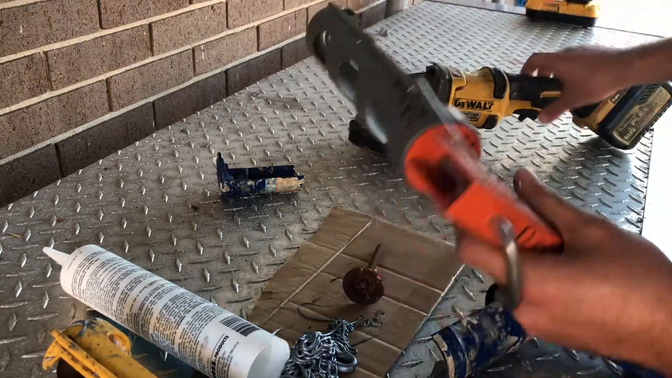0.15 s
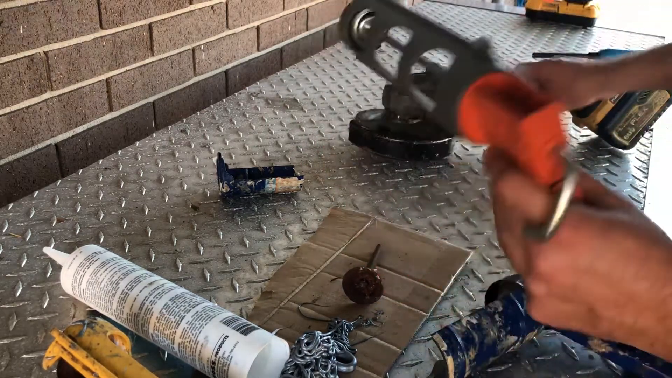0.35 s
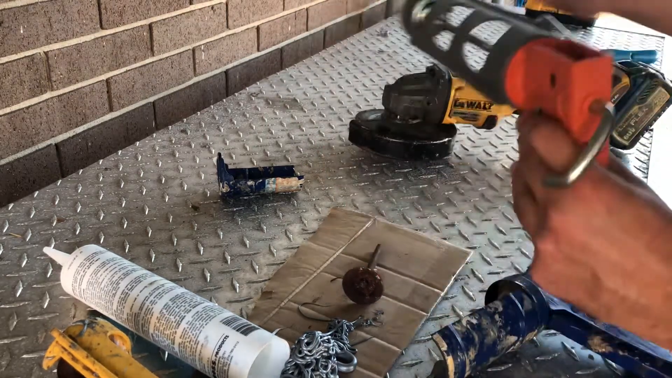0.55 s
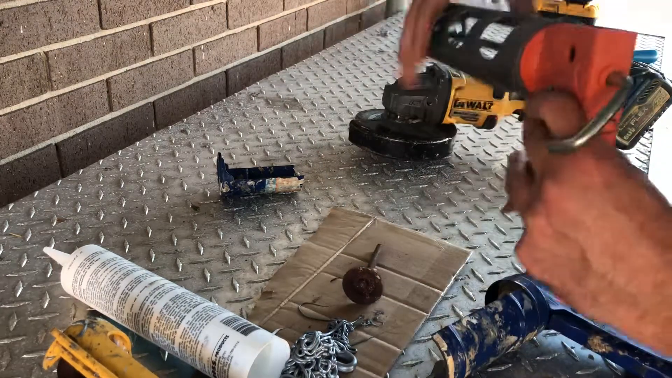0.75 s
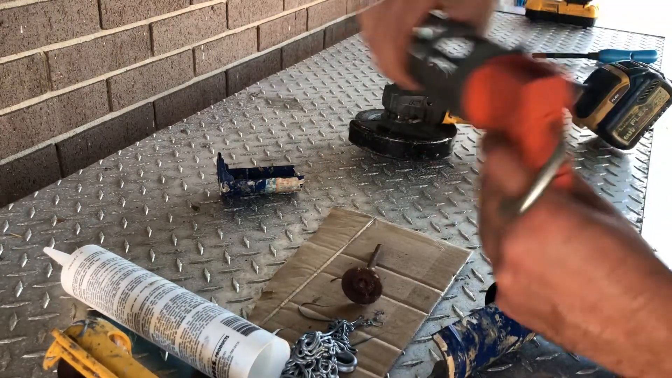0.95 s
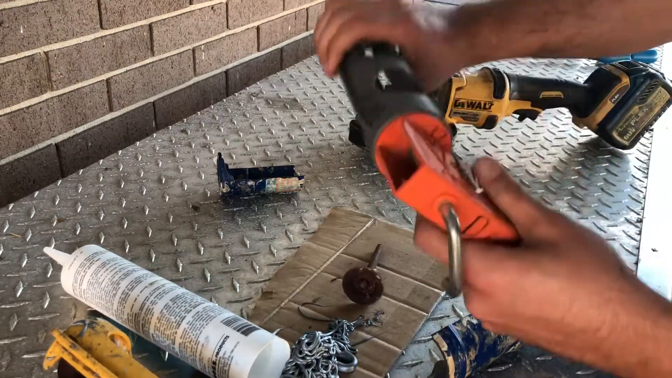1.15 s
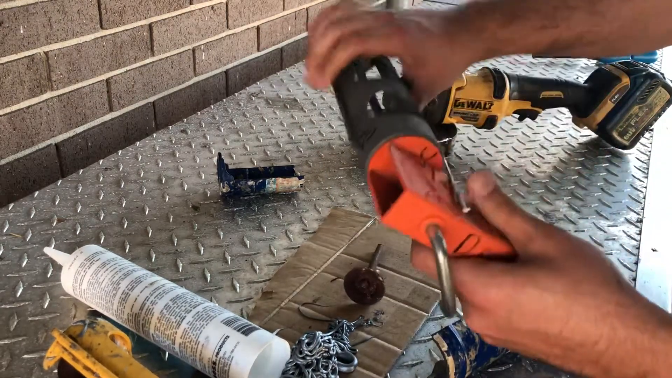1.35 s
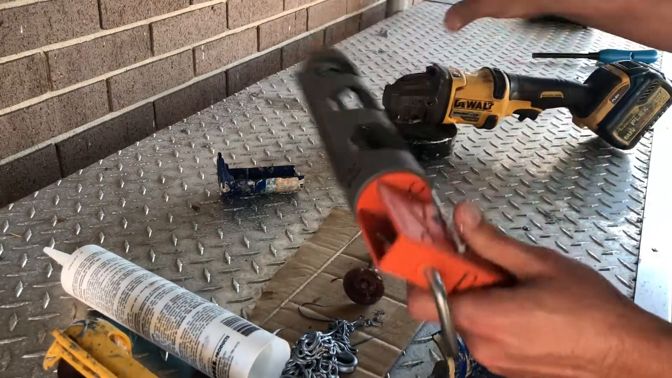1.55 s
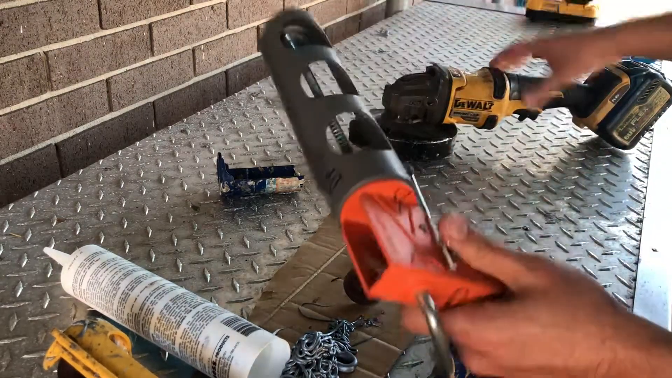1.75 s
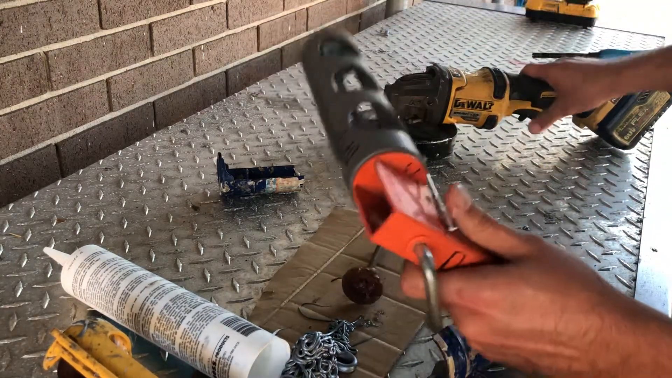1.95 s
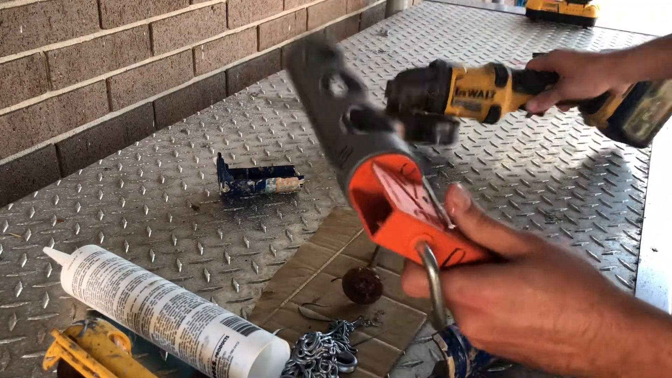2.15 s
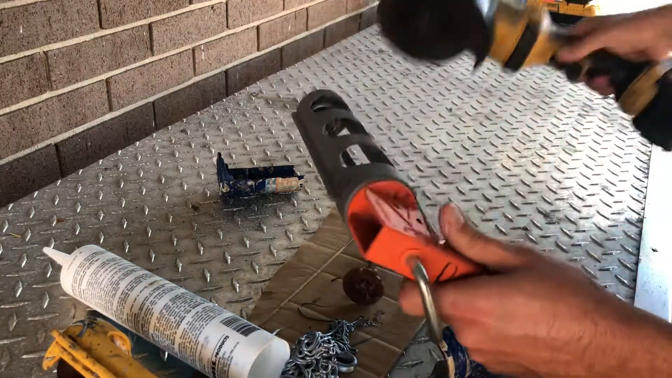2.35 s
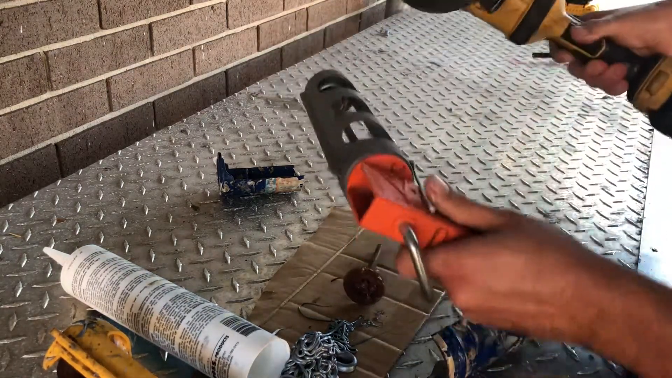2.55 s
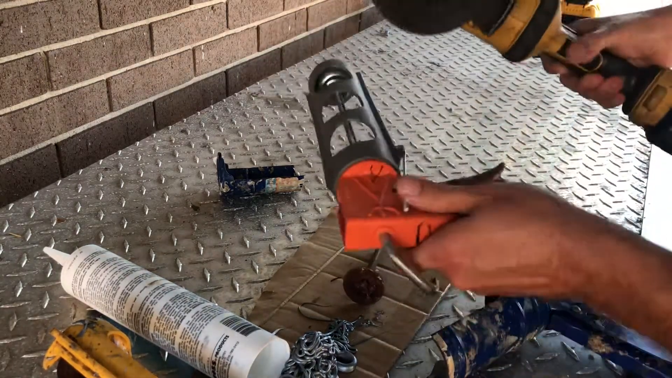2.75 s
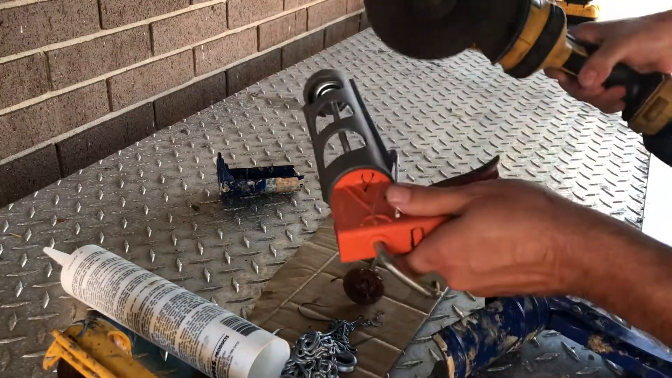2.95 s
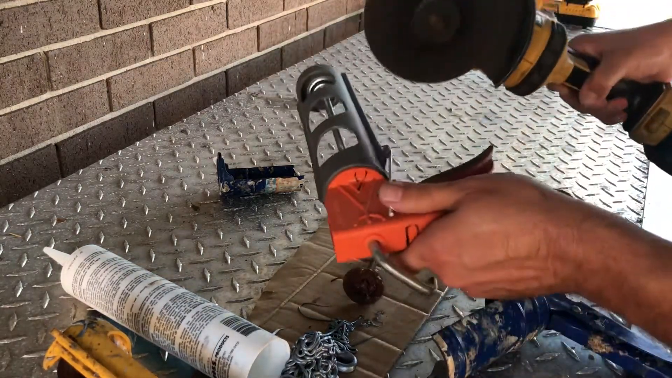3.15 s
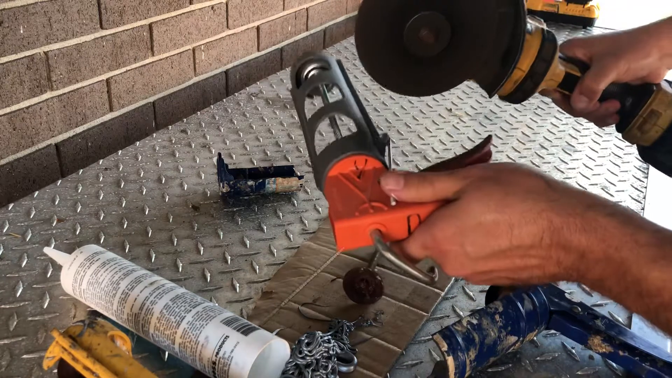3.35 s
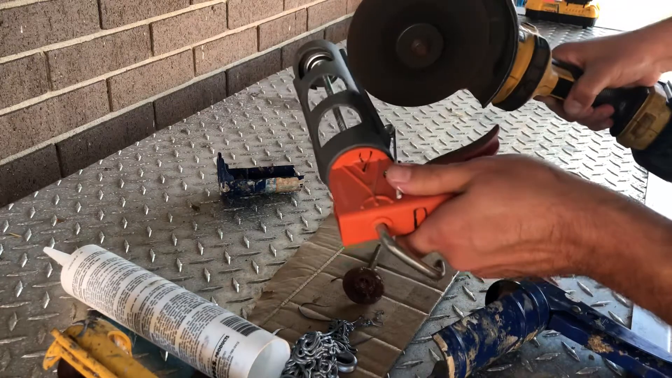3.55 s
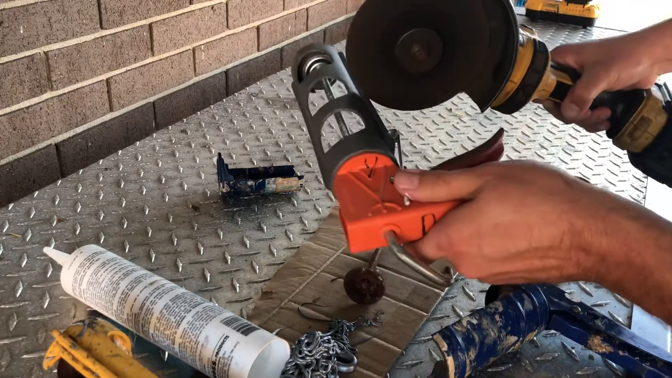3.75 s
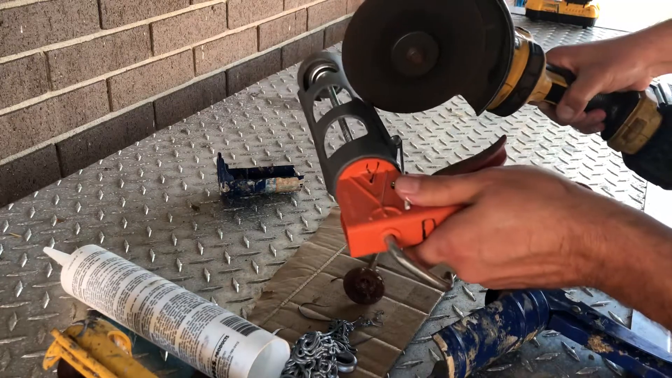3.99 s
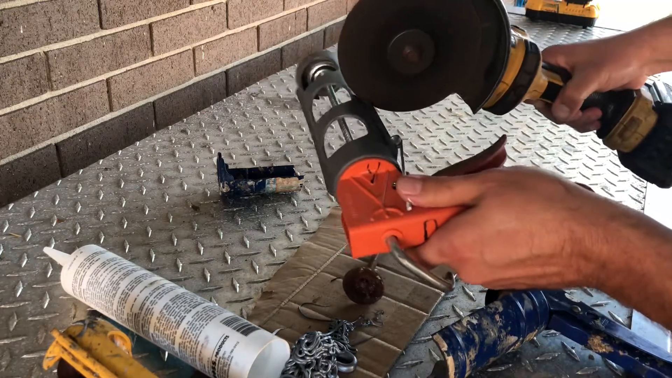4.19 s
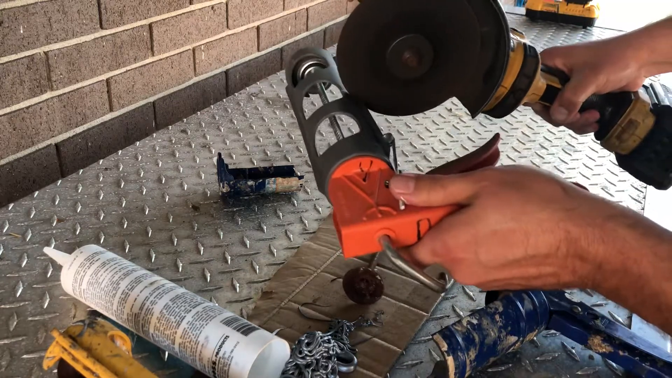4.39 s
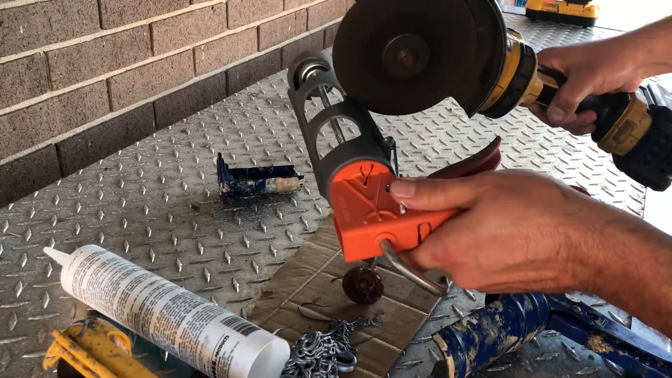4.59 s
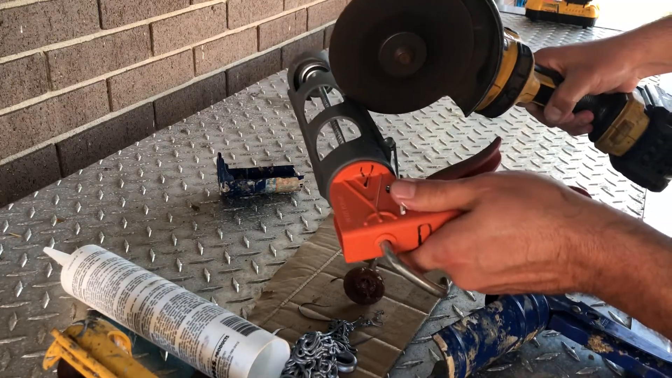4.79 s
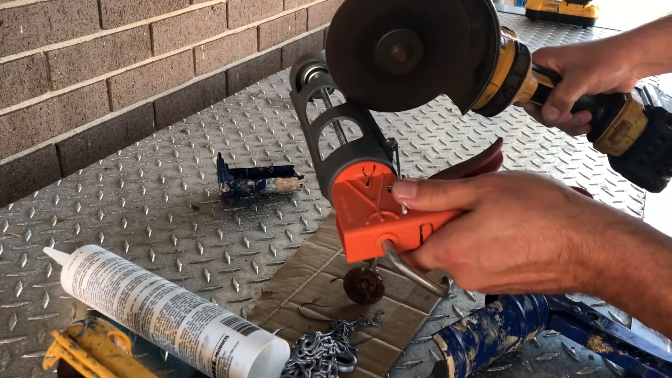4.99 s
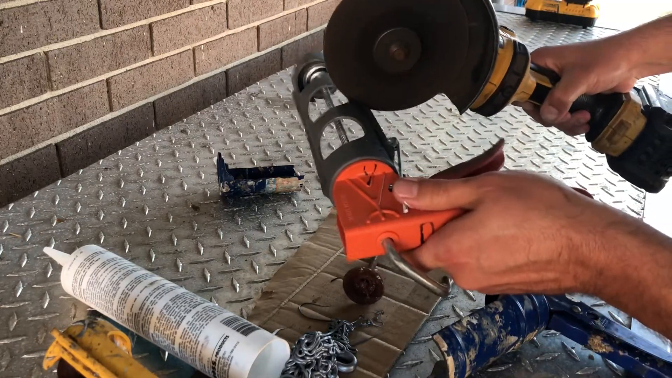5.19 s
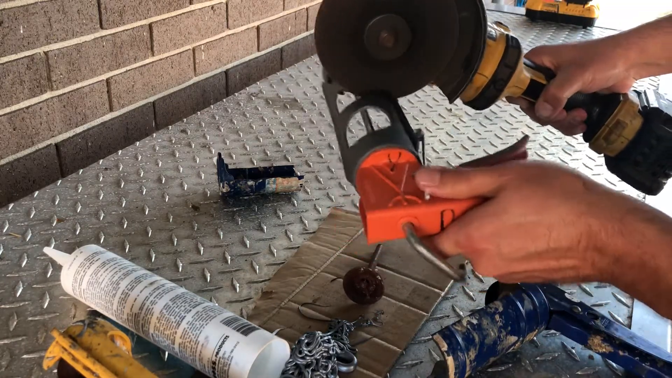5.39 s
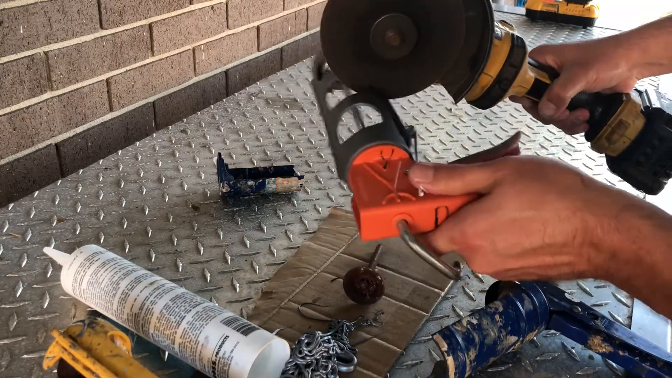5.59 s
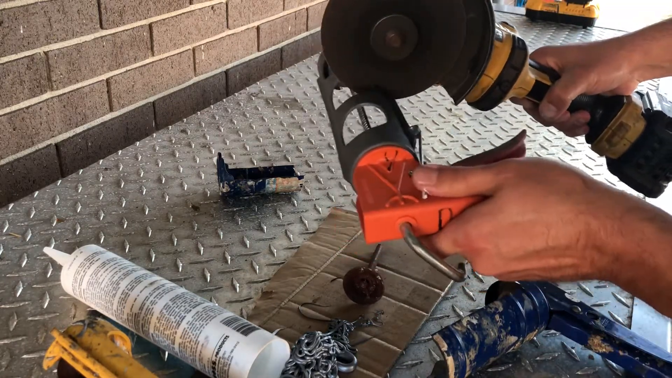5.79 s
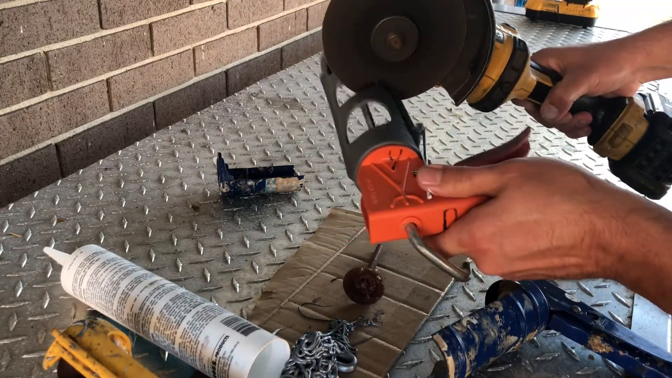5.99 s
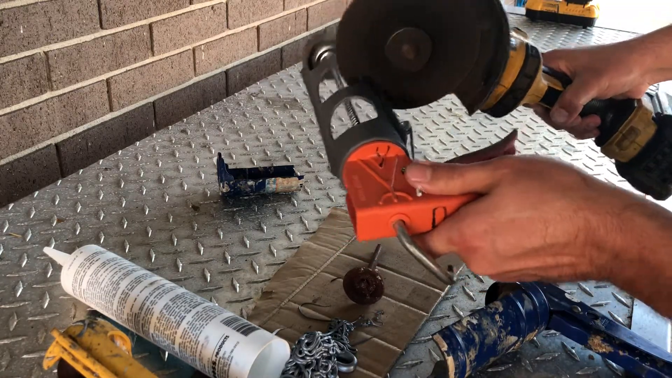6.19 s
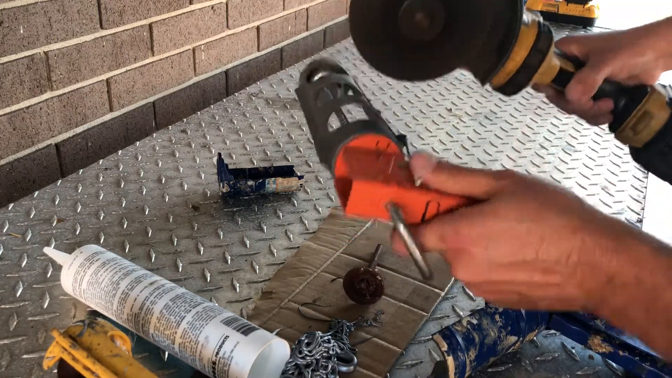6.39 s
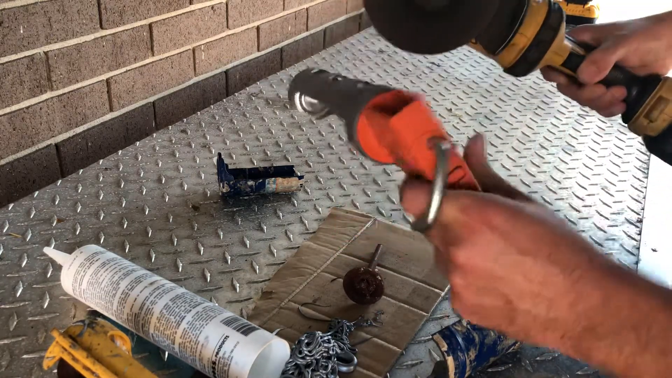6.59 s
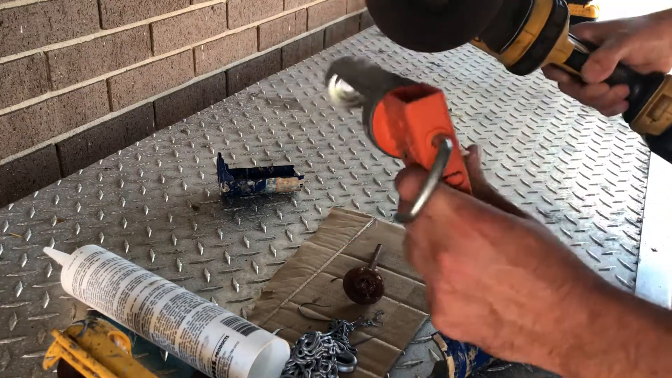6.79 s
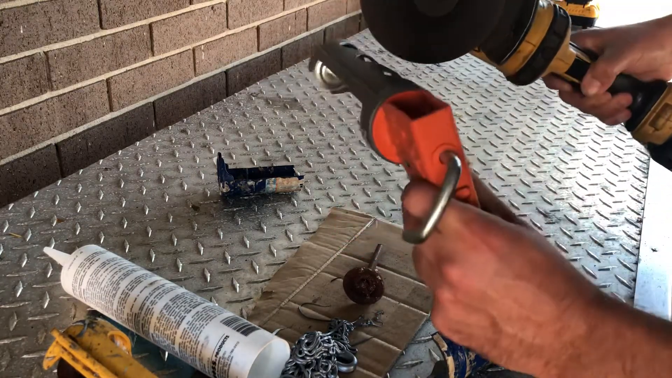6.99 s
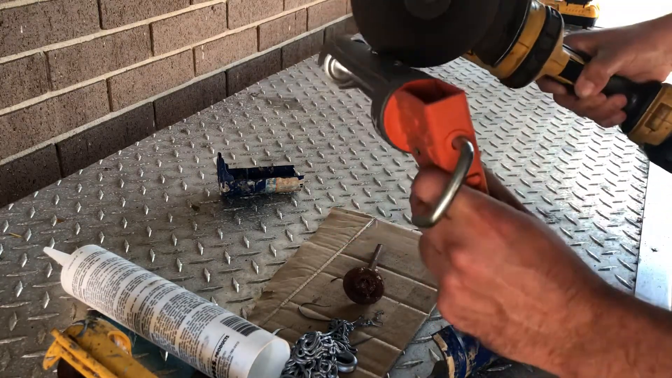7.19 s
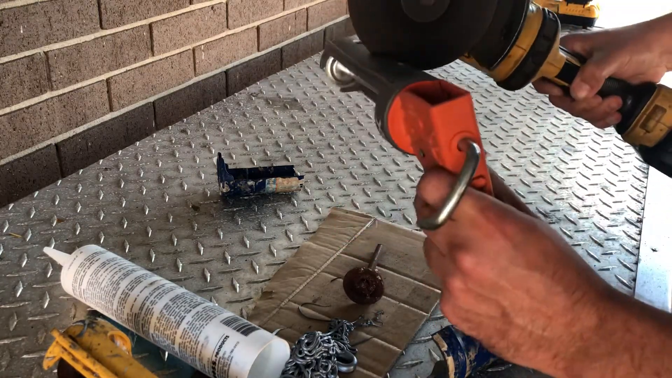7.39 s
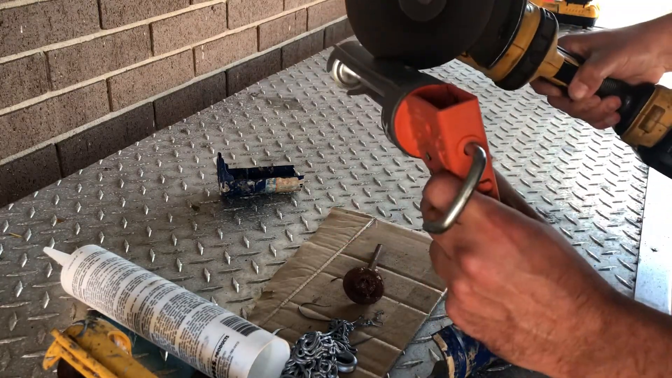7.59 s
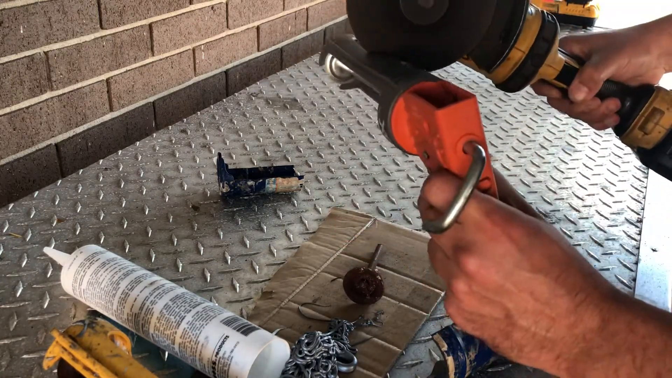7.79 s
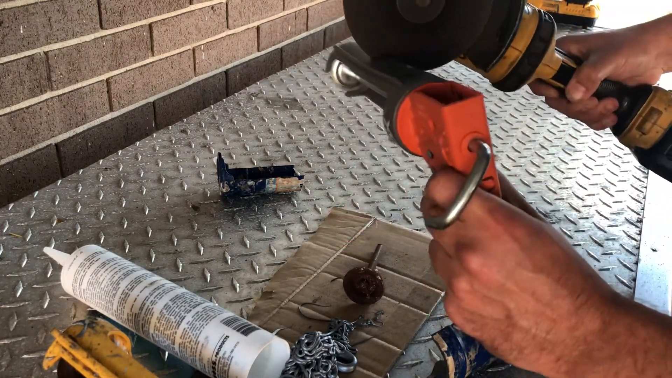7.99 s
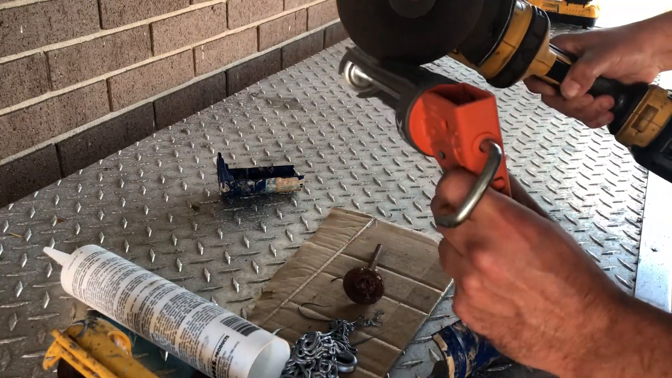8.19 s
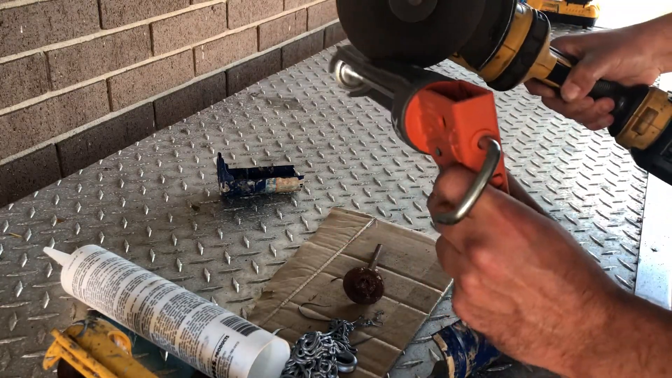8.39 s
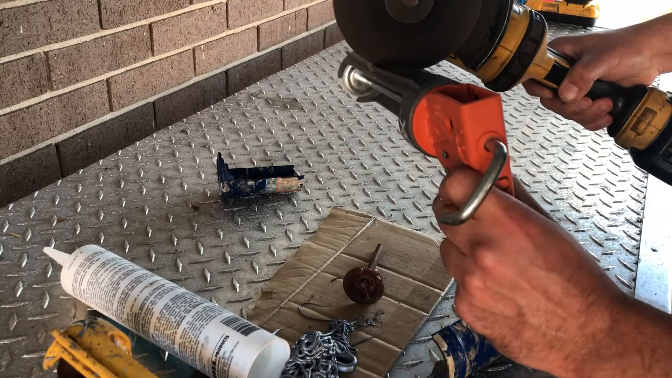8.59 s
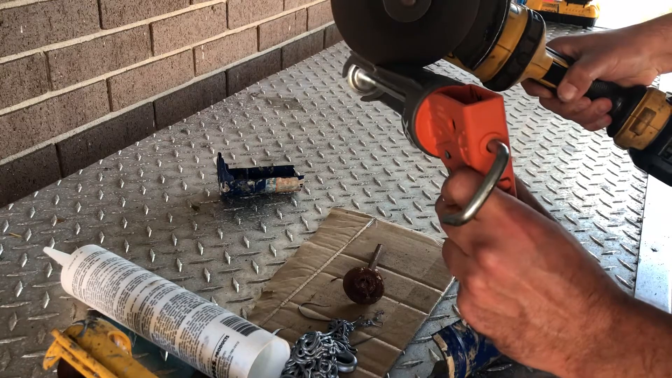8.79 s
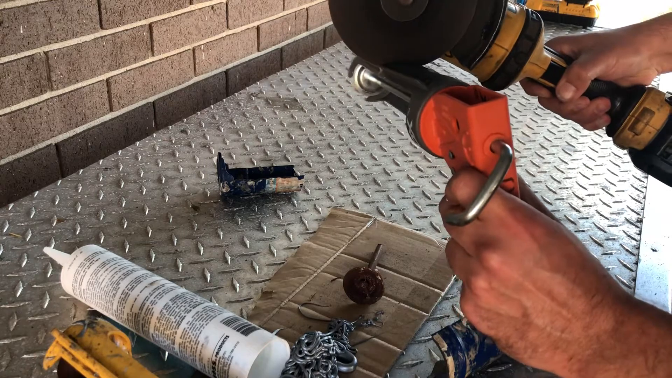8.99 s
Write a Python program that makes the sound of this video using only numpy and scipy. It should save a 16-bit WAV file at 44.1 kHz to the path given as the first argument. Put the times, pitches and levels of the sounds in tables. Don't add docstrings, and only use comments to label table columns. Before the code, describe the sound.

A quiet open yard: low wash, thin steady whistles of a far fan, faint traffic rumble. From 0.2 s, hands shift a steel frame with plastic parts close to the microphone: faint rubs, a sharper click near 1.1 s, a hard clack at 1.6 s, more clicks and scrapes to 2.2 s, with a dull thud at 2.13 s as the grinder leaves the bench. Near quiet follows, then switch clicks at about 3.1 s and a fast rising whine to full speed by 3.4 s. From 3.55 s the disc bites steel: loud, harsh, gritty sizzle, buzzing low ring and wavering squeals, with sharp early knocks. It eases around 6.2 s; at 6.43 s the trigger is released and the pitch sinks with rattling gears. At 7.0 s it revs up again, catches sharply at 7.28 s, and cuts with shriller ringing until the 9 s end.

```python
import sys
import numpy as np
from scipy import signal
from scipy.io import wavfile
from scipy.ndimage import uniform_filter1d, map_coordinates

SR = 44100
rng = np.random.default_rng(int(sys.argv[2]) if len(sys.argv) > 2 else 0)


def wav_record(signal):
    frames = np.transpose(np.atleast_2d(signal))
    bounded = np.clip(frames, -1, 1)
    quanta = np.round(bounded * 32767).astype(np.int16)
    wavfile.write(sys.argv[1], SR, quanta)


def linear_from_db(decibels):
    return 10 ** (np.asarray(decibels, float) / 20)


N = 399105
T = np.arange(N) / SR
FREE_SPEED = 127.3
GEAR_RATIO = 3.3
RELEASE_S, REPRESS_S = 6.43, 6.985

# time_s, sizzle_db
CUTS = [
    [(3.54, -24), (3.58, -20.5), (3.61, -22), (4.1, -25.5), (4.62, -24.5), (5.3, -23), (5.38, -21.5),
     (5.48, -23), (6.07, -23), (6.19, -27), (6.33, -26)],
    [(7.272, -30), (7.284, -11.5), (7.3, -32), (7.34, -22), (7.56, -23), (7.93, -22), (8.02, -24),
     (8.58, -22.5), (8.73, -24), (9.05, -26)],
]
# squeal_db, ring_db at free speed, ring_db per turn a second lost
BITES = [
    (-6, -1, 0.31),
    (-4, -9.5, 2),
]
# pitch_hz, width_hz, level_db
FRAMES = [
    [(2420, 91, 18.5), (2720, 24, -50), (3350, 48, 1), (4330, 1300, -0.5), (5980, 25, -39), (7220, 100, 1),
     (8150, 550, -3), (9640, 31, -17), (11700, 48, -25), (11800, 38, -29)],
    [(2840, 100, 13.5), (3900, 34, 5), (4520, 17, -14), (5180, 370, 6.5), (6450, 300, -4), (7760, 900, 1.5),
     (8200, 28, -9), (9140, 700, -4.5), (9400, 220, -8.5)],
]
RIM_KEPT = (.84, .91)
# centre_s, length_s, pitch_hz, width_hz, level_db
SINGS = [(3.75, .3, 4435, 200, -29), (4.25, .3, 4350, 200, -24), (4.5, .3, 4440, 200, -30),
         (4.82, .2, 4050, 110, -24), (5.05, .25, 4260, 170, -32), (5.05, 0.24, 2370, 110, -26),
         (4.8, 0.34, 7500, 100, -24), (5.13, 0.35, 7530, 120, -21), (5.55, .3, 4610, 220, -25),
         (5.6, 0.18, 8100, 300, -23), (5.88, 0.27, 7800, 220, -26), (5.85, .3, 8440, 300, -29),
         (3.2, 0.14, 11000, 200, -33), (5.38, .08, 14200, 600, -28), (4.75, .4, 3320, 110, -33),
         (4.55, .3, 8270, 200, -37), (7.4, 0.33, 7650, 300, -23), (7.7, .4, 7850, 300, -21),
         (7.6, 0.38, 4390, 200, -28), (7.55, .3, 5170, 150, -26), (7.85, 0.31, 5500, 150, -25),
         (8.3, 0.38, 5170, 250, -26), (8.1, 0.32, 3900, 150, -32), (7.55, .35, 2250, 74, -30),
         (7.8, 0.37, 9350, 300, -26), (10, .3, 9470, 300, -27), (8.35, .3, 7670, 250, -27),
         (8.75, 0.28, 6700, 150, -28), (7.6, 0.36, 6620, 160, -26), (8.85, .3, 4200, 250, -35),
         (7.35, .15, 15150, 300, -28), (7.35, 0.18, 11300, 300, -24), (7.45, .35, 12250, 250, -25),
         (7.9, .6, 13050, 270, -25), (7.6, .5, 14100, 250, -28), (8.45, 0.27, 11200, 500, -24),
         (6.05, .3, 14000, 900, -25), (8.9, .3, 1140, 330, -30), (7.65, 0.55, 2750, 110, -25),
         (8.2, 0.48, 2720, 130, -25), (8.7, 0.33, 2780, 150, -31), (8.43, 0.97, 1725, 43, -32.5),
         (3.31, 0.24, 236, 60, -45.5), (7.15, .25, 235, 50, -46)]
# centre_s, depth_db, length_s
GAPS = [(3.387, 4.5, 0.027), (3.586, 11, 0.011), (3.618, 11, 0.0046), (3.656, 7.5, 0.01),
        (3.717, 5.5, 0.034), (4.038, 4.5, 0.045), (4.36, 2.5, 0.095), (4.675, 5, 0.058),
        (5.267, 3.5, 0.032), (5.365, 3, 0.064), (6.092, 6, 0.032), (6.147, 4, 0.058), (6.975, 12, 0.0083),
        (7.128, 2.5, 0.022), (7.293, 6, 0.022)]


def grinder():
    turns, speed, parts, coast = disc_motion()
    gap_db = sum(db * swell(s, length) for s, db, length in GAPS)
    shiver = turns + .0008 * wander(30)
    cutting = sum(cut(shiver, speed, *row) for row in zip(CUTS, BITES, FRAMES, RIM_KEPT))
    cutting = cutting + surges(disc_edge(turns, same=.95), SINGS)
    touching = gears(turns, parts, coast) + cutting
    return linear_from_db(-gap_db) * touching + motor(turns, speed, parts) + knocks()


# time_s, speed in turns a second
SPEED = [(3.09, 4), (3.235, 67), (3.29, 86), (3.39, 126.5), (3.68, 127.3), (4.55, 123.6), (5.23, 120.8),
         (5.35, 118.5), (5.45, 122), (6.05, 122), (6.43, 126.5), (6.72, 95), (6.97, 71), (7.13, 125.5),
         (7.19, 127.3), (7.9, 123.8), (8.5, 123.2), (9.05, 121.6)]


def disc_motion():
    full_pull, settle_s = 350, .15
    speed = curves(SPEED, off=0)[0]
    pull = uniform_filter1d(np.clip(np.gradient(speed) * SR / full_pull, 0, 1), 600)
    load = 0
    for rows in CUTS:
        start, end = rows[0][0], rows[-1][0]
        lift = end - settle_s * (end < T[-1] - settle_s)
        load = load + np.interp(T, [start, start + settle_s, lift, end], [0, 1, 1, 0])
    coast = uniform_filter1d(1. * (T > RELEASE_S) * (T < REPRESS_S), 200)
    halvings = np.log2(FREE_SPEED / (speed + 1))
    return np.cumsum(speed) / SR, speed, (1, halvings, pull, load, coast * halvings), coast


# pitch_hz, level_db per Hz
CUT_COLOUR = [(120, -88), (200, -23.5), (365, -11), (692, -21.5), (1460, -9), (2770, -20.5), (3510, -10),
              (4450, -12), (7030, -11), (7700, -7), (10500, -5.5), (12000, -7), (15700, -4.5)]
# multiple of disc speed, level_db over the sizzle
ORDERS_DB = [(2, -29), (4, -20), (14, -20), (18, -45), (20, -48)]
# centre_s, length_s, swell_db
BINDS = [(3.902, 0.31, 5.5), (4.184, .06, 7), (4.5, 0.43, 5), (4.798, .1, 6.5), (5.1, 0.39, 6.5),
         (5.6, .08, 1.5), (5.734, .07, 9), (5.863, 0.053, 2), (5.95, .05, 1), (6.05, 0.041, -1),
         (6.14, 0.11, -8), (6.298, .07, 3), (7.497, 0.27, 5), (8.098, 0.092, 4), (8.24, 0.091, 3.5),
         (8.483, 0.064, 6.5), (8.954, 0.31, 8)]


def cut(turns, speed, pressure, bite, frame, kept):
    press_db = curves(pressure)[0]
    sag = np.clip(FREE_SPEED - speed, 0, 9)
    squeal_db = bite[0] + 1.6 * sag + 0.83 * wander(3.6)
    binds_db = sum(db * swell(s, length) for s, length, db in BINDS)
    late_db = 12 * np.exp(-(T - pressure[0][0]).clip(0) / 0.17)
    ring_db = bite[1] + bite[2] * sag + binds_db - late_db

    wobble = 1 + 0.12 * np.cos(2 * np.pi * turns) + 0.26 * np.cos(6 * np.pi * turns)
    grit = band(disc_edge(turns, same=kept), 430, 20000) + .5 * rng.standard_normal(N)
    edge = wobble * linear_from_db(1.75 * wander(22)) * grit
    sizzle = colour(edge, CUT_COLOUR, patchy_db=2.6, wide=3, long=120)
    sizzle = sizzle + linear_from_db(2.5) * ring(sizzle, frame)
    sizzle = sizzle / np.std(band(sizzle, 12870, 16800)[round(3.4 * SR):])

    squeal = evened(ring(disc_edge(turns, same=0.69), [(7650, 190, 16), (7030, 85, -19)]))
    pair = sum(linear_from_db(1.5 * wander(1.1)) * np.cos(2 * np.pi * k * turns) for k in (12, 13))
    low = evened(pair) + 0.35 * evened(ring(edge, [(1520, 150, 0)]))
    orders = 0
    for k, db in ORDERS_DB:
        orders = orders + linear_from_db(db + 0.5 * wander(0.57)) * np.cos(2 * np.pi * (k * turns + rng.random()))
    return linear_from_db(press_db) * (sizzle + linear_from_db(squeal_db - 11.0) * squeal + linear_from_db(ring_db - 2.5) * low + orders)


def disc_edge(turns, same):
    same = np.clip(same, 0, .97)
    grit = rng.standard_normal((800, 400))
    grit = signal.lfilter([np.sqrt(1 - same ** 2)], [1, -same], grit, axis=0)
    return map_coordinates(grit.ravel(), [turns * grit.shape[1]], order=3)


# pitch_hz, level_db per Hz
GEAR_COLOUR = [(88, -63), (150, -46), (340, -18.5), (712, -12), (831, -1.5), (934, -11), (1200, 1),
               (1710, -5.5), (2830, -2), (3650, -3.5), (4430, -1.5), (5710, -6), (15700, -25.5)]
# pitch_hz, width_hz, level_db
GEAR_BODY = [(259, 48, 12.5), (2050, 444, 3.5), (2650, 380, -10.5)]
# pitch_hz, width_hz, level_db
GEAR_HEAD = [(4490, 220, 10), (4960, 590, 8.5)]
# pitch_hz, level_db per Hz
FAN = [(4000, -34), (6000, 2), (8000, 2), (10000, -1), (11700, -10.5), (14000, -9), (15800, -6)]
# time_s, body_db
EFFORT = [(3.1, -22), (3.17, -18.5), (3.5, -15), (3.66, -20.5), (4.3, -21), (5.1, -21.5), (5.9, -20.5),
          (6.5, -23.5), (6.96, -24), (7.0, -19.5), (7.22, -19.5), (7.36, -23), (8.3, -22), (9.05, -19.5)]
# free_db, db per halving of speed, pull_db, load_db, db per halving when coasting
HEAD_LAW = (-1, -4.5, 0, 4.5, -4)
FAN_LAW = (3, -6.5, 3.5, 1, -32)
# centre_s, length_s, pitch_hz, width_hz, level_db
SURGES = [(3.19, 0.1, 2280, 110, -14.5), (3.28, .16, 2400, 290, -18.5), (6.6, 1.2, 241, 27, -50.5),
          (3.2, 0.092, 4850, 210, -18.5), (7.03, 0.1, 2760, 200, -18), (7.06, .08, 4950, 400, -20),
          (6.85, .25, 2110, 250, -29), (6.87, .2, 2750, 200, -30), (6.21, .04, 1640, 150, -19.5),
          (7.1, .025, 7700, 400, -18), (3.18, .08, 2750, 150, -24), (6.6, .6, 4480, 69, -34),
          (7.11, .05, 4500, 400, -17), (3.32, .14, 4850, 600, -19), (8.45, .15, 7700, 500, -22),
          (4.1, .7, 1765, 20, -32)]


def gears(turns, parts, coast):
    body_db = curves(EFFORT)[0]
    head_db, fan_db = law(HEAD_LAW, parts), law(FAN_LAW, parts)
    pull, load = parts[2:4]
    slack = .45 + (.36 - .45) * load + (.2 - .45) * pull + (.55 - .45) * coast
    strength = linear_from_db(2.3 * rng.standard_normal(800))[turns.astype(int)]
    knock = evened(strength * np.exp(-(turns % 1) / .11), 3.4, 9)
    knocking = knock - 1

    repeat = .1 + (.55 - .1) * load
    teeth = np.sqrt(repeat) * disc_edge(turns, same=.86) + np.sqrt(1 - repeat) * rng.standard_normal(N)
    teeth = teeth * linear_from_db(1.34 * wander(26))

    housing = band(teeth, 2300, 20000) + band(rng.standard_normal(N), 1000, 2300)
    housing = housing + linear_from_db(-9 * pull) * band(rng.standard_normal(N), 100, 1000)
    hiss = colour((1 + .5 * slack * knocking) * housing, GEAR_COLOUR, patchy_db=1.0)
    body = hiss + linear_from_db(1.0) * ring(hiss, GEAR_BODY)
    body = body / np.std(band(body, 1500, 3800)[round(3.4 * SR):])

    rattle = (1 + slack * knocking) * teeth
    head = evened(ring(rattle, GEAR_HEAD), 2.93, 8)
    fan = evened(colour(rattle + teeth, FAN, patchy_db=2.2), 4.0, 9)
    body, head, fan = (linear_from_db(1.1 * wander(5.)) * part for part in (body, head, fan))
    gearbox = body + linear_from_db(head_db - 3.5) * head + linear_from_db(fan_db - 5.5) * fan
    return linear_from_db(body_db - 1.0) * gearbox + surges(teeth, SURGES) * (T > 3.1)


# free_db, db per halving of speed, pull_db, load_db, db per halving when coasting
SHAFT_LAW = (-42, -6, 2, -2, -19)
MESH_LAW = (-50.5, 9, 29.5, 13, -7)


def motor(turns, speed, parts):
    halvings, pull = parts[1:3]
    off_peak_octaves = abs(np.log2(10 * GEAR_RATIO * (speed + 1) / 2250))
    mesh_db = law(MESH_LAW, parts) + pull * (-20 * off_peak_octaves - 12 * (T > RELEASE_S))
    angle = 2 * np.pi * GEAR_RATIO * turns
    spindle = linear_from_db(-3 - 30 * halvings) * np.cos(6 * np.pi * turns)
    shaft = linear_from_db(law(SHAFT_LAW, parts) + 1.5 * wander(10)) * (np.cos(angle) + spindle)
    mesh = linear_from_db(mesh_db + 4.5 * wander(120) - 2.5) * np.cos(10 * angle)
    return np.sqrt(2) * (speed > 0) * (band(shaft, 225, 900) + band(mesh, 1100, 2900))


# start_s, peak_db
KNOCKS = [(3.593, 0), (3.991, 2), (4.2867, 2), (4.5097, 7), (6.06, 0), (6.203, 0), (6.815, -6),
          (3.6667, 11), (3.721, 8), (3.85, 3), (4.0449, -5), (4.4442, 2), (4.7101, 2), (6.1424, -27),
          (6.3484, 1), (6.431, 4), (6.482, 3), (6.7041, -2), (6.7359, -18), (6.749, -16), (6.7694, -4),
          (6.792, 1), (6.848, -1), (6.899, 1), (3.44, 6), (3.478, 0), (3.549, 7), (3.563, 5), (3.611, 5),
          (3.633, 6), (6.986, -1), (6.9984, 6), (7.1446, -6), (7.171, -3), (7.1965, -5), (7.279, -7),
          (7.309, 7), (7.4288, 9), (7.4595, 10.5), (7.114, 7)]


def knocks():
    out, t = np.zeros(N), np.arange(600) / SR
    for s, db in KNOCKS:
        burst = rng.standard_normal(600) * linear_from_db(-60 * t / 0.019)
        low_db = 4 if s < RELEASE_S else -8
        burst = ring(burst, [(4440, 320, 10), (2370, 300, low_db)]) + 0.26 * band(burst, 1400, 9700)
        out[round(s * SR):][:600] += linear_from_db(db - 9.5) * burst / abs(burst).max()
    return out


# start_s, end_s, scrape_start_db, scrape_end_db, plastic_body_db over the scrape
SHIFTS = [(.22, 0.486, -81, -81, 26.5), (0.583, 0.627, -58, -62, 4), (.75, 0.775, -61, -62, 0),
          (.945, 0.996, -59, -63, -4), (0.99, 1.04, -49, -49, 2), (1.04, 1.09, -43, -42, -5),
          (1.094, 1.104, -27, -44, -17), (1.108, 1.15, -64, -64, -5), (1.441, 1.47, -58, -56, 6),
          (1.535, 1.576, -65, -61, -1), (1.572, 1.625, -56, -44, 10.5), (1.629, 1.665, -43, -41.5, 8),
          (1.789, 1.847, -39.5, -35, 2), (1.84, 1.872, -41, -59, 7), (1.976, 2.026, -59, -52, 9),
          (2.027, 2.068, -48, -56, 8), (2.069, 2.1, -60, -68, 9), (2.128, 2.157, -56, -50, 10),
          (2.164, 2.189, -43, -38, 3), (2.2, 2.203, -56, -70, 5), (2.905, 2.915, -62, -48, 0),
          (2.914, 2.929, -41, -60, 2), (2.93, 2.96, -68, -66, 10), (3.08, 3.094, -29, -46, 13)]
# pitch_hz, level_db per Hz
SCRAPE = [(1290, -9), (2200, -2), (2430, 4), (3720, -5), (4250, -1), (11400, -8), (15700, -7.5)]
# start_s, peak_db, ring_hz, tick_db over the ring, t60_s
CLICKS = [(0.585, -44, 1840, -3, 0.027), (0.6114, -45, 1660, -17, 0.03), (0.991, -35, 1820, -3, 0.024),
          (1.0944, -25.5, 2660, 1.5, 0.015), (1.443, -35, 2400, -10, 0.023), (1.62, -34, 3750, -30, .03),
          (1.64, -27, 1500, -25, .02), (1.075, -38, 2600, -8, .015), (1.062, -40, 3200, -8, .015),
          (1.6326, -9.5, 1606, -25, 0.033), (1.6318, -14, 3650, -18, 0.02), (1.662, -24, 1590, -17, 0.04),
          (1.7903, -36, 2540, -11, 0.03), (1.8203, -21, 3120, -9, 0.03),
          (1.8424, -16.5, 1620, -11.5, 0.032), (2.0253, -33, 3550, -17, 0.03),
          (2.0655, -36, 1810, -22, 0.03), (2.134, -25, 2500, -32, 0.025), (2.158, -24, 3750, -17, 0.03),
          (2.1895, -23.5, 1750, -23, 0.033), (2.2882, -39, 2310, -29, 0.03), (2.558, -52, 5200, -6, 0.03),
          (2.808, -48, 3200, -20, 0.02), (2.834, -46, 2900, -10, 0.03), (2.291, -48, 4700, -20, 0.02),
          (2.9148, -35, 2840, -14, 0.03), (2.9158, -33, 4900, -20, 0.02), (2.9844, -35, 1810, -25, 0.026),
          (3.0795, -13.5, 2110, -7, 0.022), (3.1007, -15, 2290, -26, 0.03)]
# time_s, level_db
THUD = [
    (2.125, -69),
    (2.135, -31.5),
    (2.15, -36.5),
    (2.19, -39),
    (2.21, -45),
    (2.3, -66),
]


def handling():
    grain = rng.standard_normal(N) * linear_from_db(2.6 * wander(200))
    scrape = colour(grain, SCRAPE)
    scrape = scrape / np.std(band(scrape, 2800, 22000))
    body = evened(ring(grain, [(2650, 670, -0.1), (3470, 520, -0.9)]))
    out = linear_from_db(curves(THUD)[0]) * evened(ring(grain, [(223, 28, 11.0), (690, 610, -0.5)]))
    for start, end, db, end_db, body_db in SHIFTS:
        near = slice(round((start - .002) * SR), round((end + .0072) * SR))
        times = [start - .002, start, end, end + 0.0072]
        stroke_db = np.interp(T[near], times, [-100, db, end_db, end_db - 31])
        out[near] += linear_from_db(stroke_db) * (scrape[near] + linear_from_db(body_db - 6.0) * body[near])

    t = np.arange(2500) / SR
    noises = rng.standard_normal((len(CLICKS), 2500))
    for (s, db, hz, tick_db, t60), noise in zip(CLICKS, noises):
        tone = np.sin(2 * np.pi * hz * t) * linear_from_db(-60 * t / (.5 * t60))
        tone = tone + .25 * band(noise, .6 * hz, 2.2 * hz) * linear_from_db(-60 * t / t60)
        tone = band(tone, .55 * hz, 12000)
        tick = band(noise, 3500, 17000) * linear_from_db(-60 * t / .009)
        click = tone + linear_from_db(tick_db + 9.5) * tick / abs(tick).max()
        out[round(s * SR):][:2500] += linear_from_db(db - 0.5) * click
    return out


def wall(x):
    t = np.arange(6000) / SR
    tail = rng.standard_normal(6000) * linear_from_db(-60 * t / 0.21) * (t > .003)
    return signal.oaconvolve(x, tail / np.linalg.norm(tail))[:N]


# pitch_hz, level_db per Hz
YARD = [(100, -35), (170, -3), (306, -9), (330, -15), (370, -3.5), (560, -14.5), (703, -8.5), (1090, -6),
        (1240, -3), (1560, -11), (1850, -6), (2280, -19.5), (4330, -26.5), (4590, -32), (15700, -48)]
# pitch_hz, width_hz, level_db
HUM = [(301, 7.3, -4), (750, 37, -2), (1256, 22, -5.5), (1820, 4.2, 5.5), (2650, 74, -59), (2940, 100, -28),
       (4400, 11, -17), (8600, 530, -45)]
# time_s, level_db
DUCK = [
    (0, 1),
    (3.1, 1.5),
    (3.7, 0),
    (9.05, -24),
]
# time_s, level_db
RUMBLE = [(0, -51.5), (3.55, -53), (3.7, -59), (5.5, -65.5), (7.2, -55), (7.8, -61), (8.62, -60),
          (8.8, -50), (9.05, -57)]


def yard():
    noise = rng.standard_normal(N)
    wash = evened(colour(noise, YARD, patchy_db=1.6, wide=2, long=6))
    core = sum(linear_from_db(db + wander(2)) * np.cos(2 * np.pi * hz * T) for hz, width, db in HUM[:4])
    whistles = evened(ring(noise, HUM)) + linear_from_db(-6) * evened(core)
    rumble = evened(band(ring(noise, [(74.6, 49, 0), (116, 33, 0)]), 58, 136))
    air = linear_from_db(-51 + curves(DUCK)[0]) * (wash + linear_from_db(-3.5) * whistles)
    return air + linear_from_db(curves(RUMBLE)[0]) * rumble


def surges(teeth, rows):
    out = np.zeros(N)
    for s, length, hz, width, db in rows:
        near = slice(round((s - 1.5 * length) * SR), round((s + 1.5 * length) * SR))
        out[near] += linear_from_db(db) * swell(s, length)[near] * evened(ring(teeth[near], [(hz, width, 0)]))
    return out


def swell(centre_s, length_s):
    return np.exp(-((T - centre_s) / (length_s / 2)) ** 2)


def law(weights_db, parts):
    return sum(db * part for db, part in zip(weights_db, parts))


def evened(x, t0=0, t1=99):
    return x / np.sqrt(np.mean(x[round(t0 * SR):round(t1 * SR)] ** 2) + 1e-20)


def curves(rows, off=-120):
    s, first, *rest = np.transpose(rows)
    after = first[-1] if s[-1] > 9 else off
    return [np.interp(T, s, first, off, after)] + [np.interp(T, s, c) for c in rest]


def colour(x, points, patchy_db=0., wide=5, long=30):
    hz, t, z = signal.stft(x, SR, nperseg=512)
    f, db = np.transpose(points)
    patches = rng.standard_normal(z.T.shape).T
    patches = evened(uniform_filter1d(uniform_filter1d(patches, int(wide), 0), int(long), 1))
    gain = linear_from_db(np.interp(np.log(hz + 1), np.log(f), db)[:, None] + patchy_db * patches)
    return signal.istft(z * gain, SR, nperseg=512)[1][:N]


def band(x, lo_hz, hi_hz):
    return signal.sosfilt(signal.butter(3, [lo_hz, min(hi_hz, 20000)], "band", fs=SR, output="sos"), x)


def ring(x, modes):
    return sum(linear_from_db(db) * signal.lfilter(*signal.iirpeak(hz, hz / width, SR), x) for hz, width, db in modes)


def wander(per_s, step=16):
    pole = np.exp(-2 * np.pi * per_s * step / SR)
    slow = signal.lfilter([1], [1, -pole], rng.standard_normal(N // step + 1))
    return np.interp(np.arange(N) / step, np.arange(len(slow)), evened(slow))


def scene():
    near = handling()
    mix = near + linear_from_db(-18.0) * wall(near) + grinder() + yard()
    return np.array([mix, mix])


def low_pass(x):
    return signal.sosfilt(signal.butter(12, 16310, fs=SR, output="sos"), x)


def record(dry):
    limited = dry / (1 + abs(dry / 1.05) ** 3) ** (1 / 3)
    limited = signal.sosfilt(signal.butter(2, 50, "high", fs=SR, output="sos"), limited)
    edge = signal.firwin(601, 15790, window=("kaiser", 7), fs=SR)
    mix = signal.oaconvolve(limited, edge[None], "same")
    return low_pass(mix)


dry = scene()
out = record(dry)
wav_record(out)
```